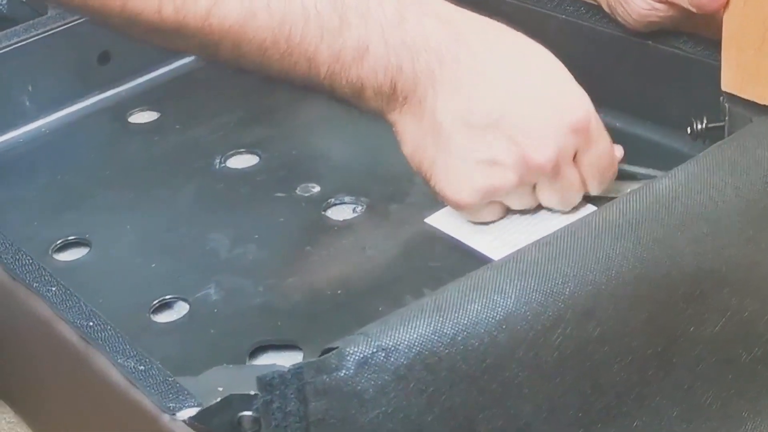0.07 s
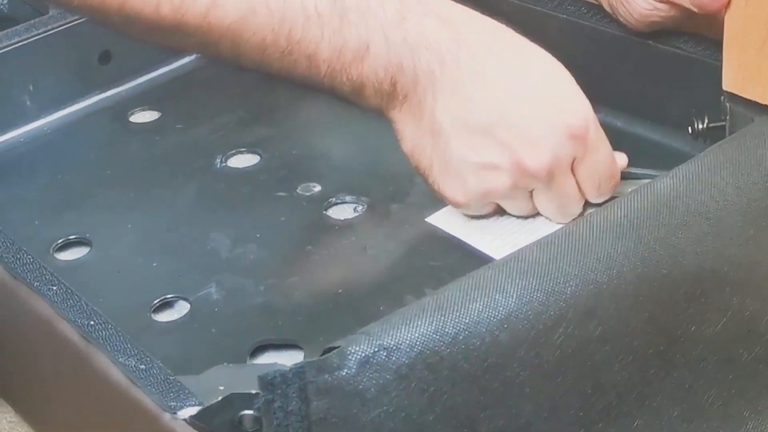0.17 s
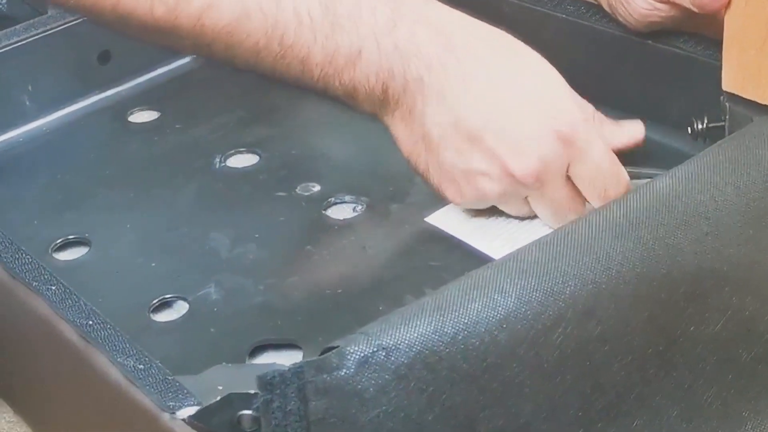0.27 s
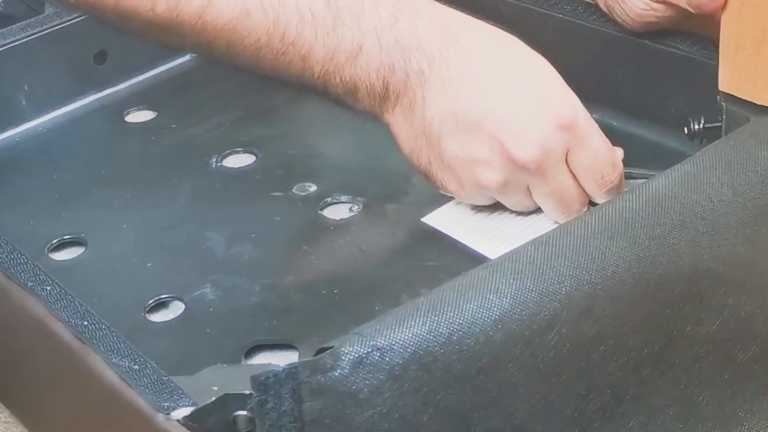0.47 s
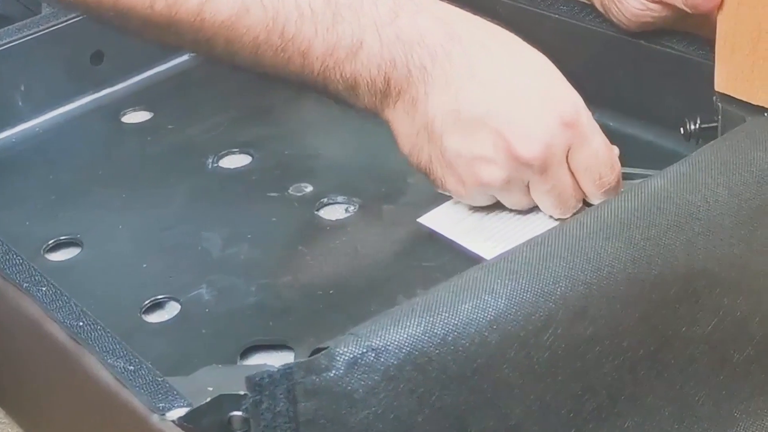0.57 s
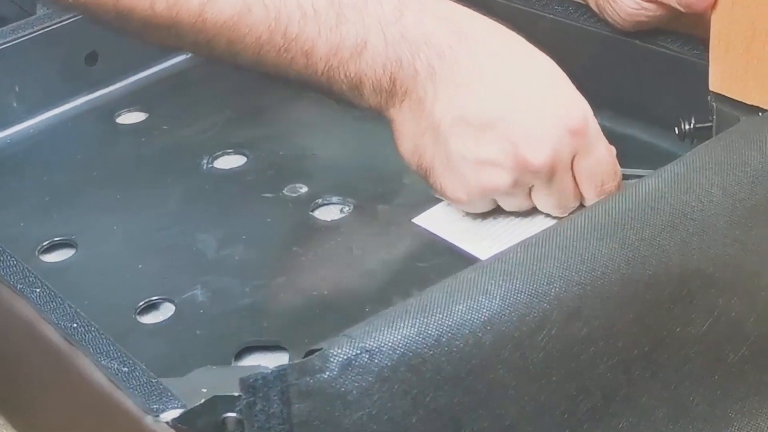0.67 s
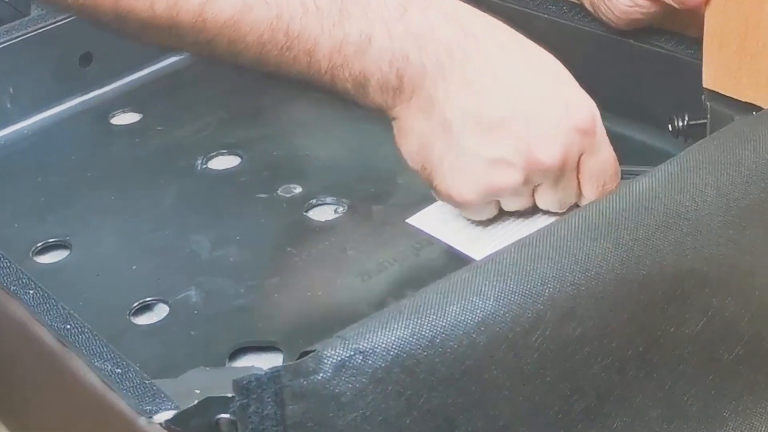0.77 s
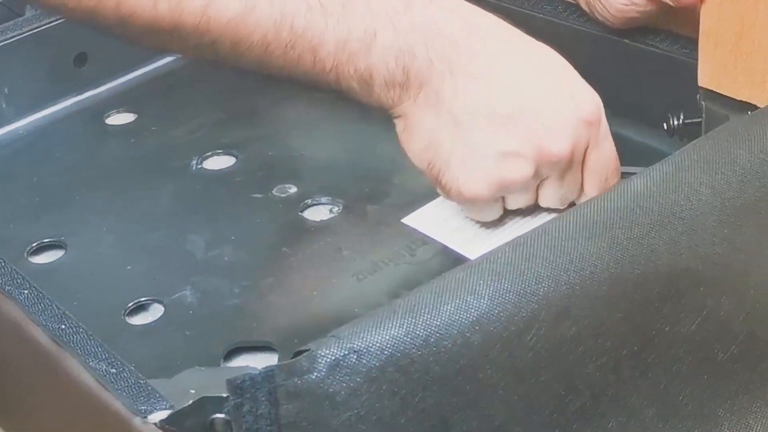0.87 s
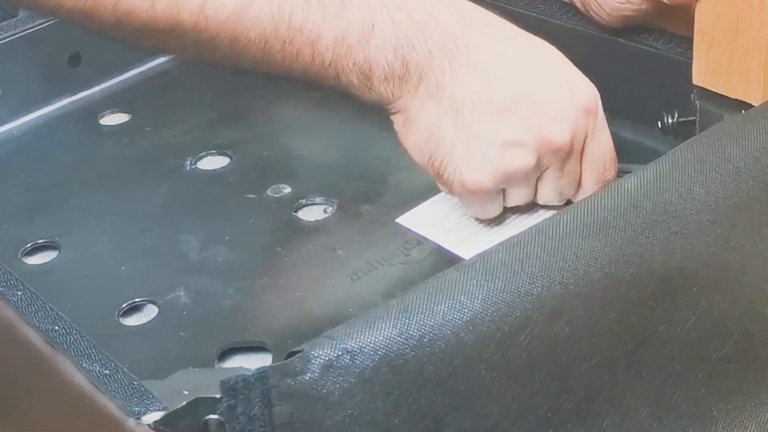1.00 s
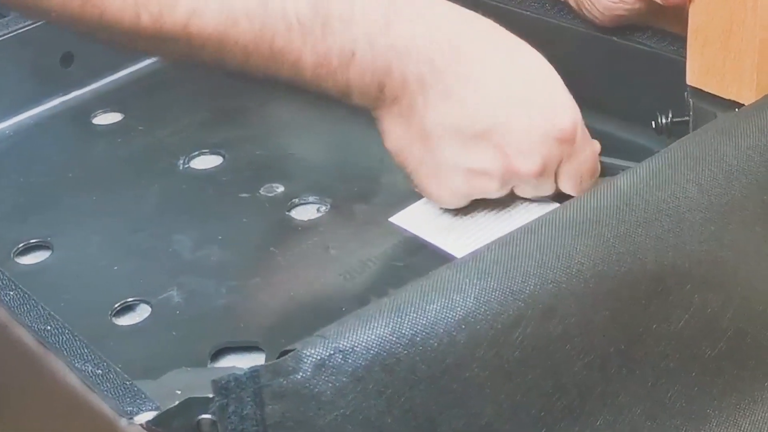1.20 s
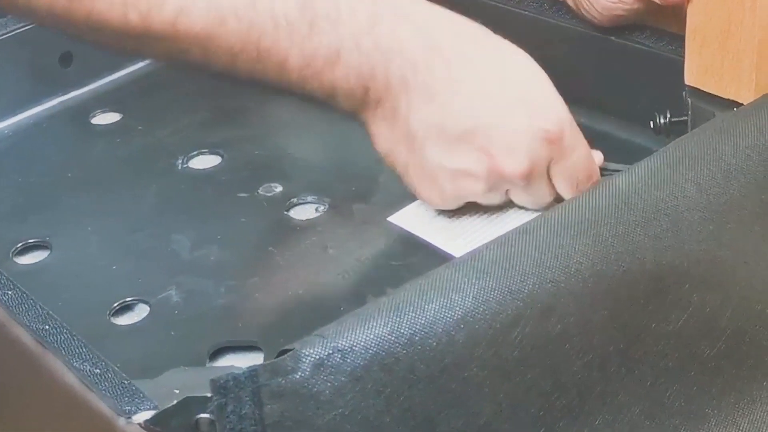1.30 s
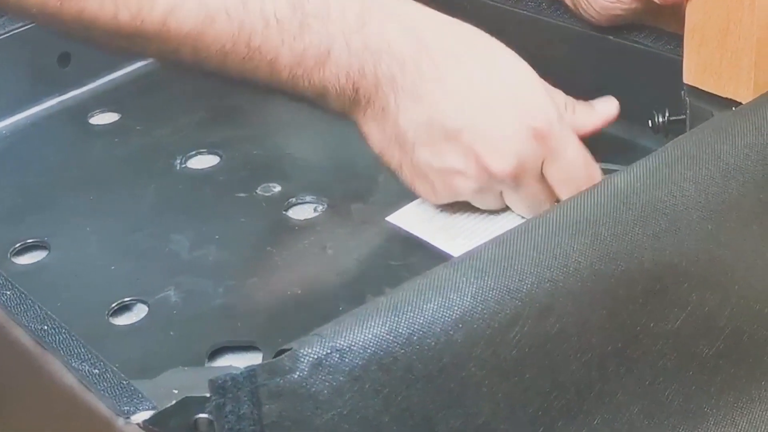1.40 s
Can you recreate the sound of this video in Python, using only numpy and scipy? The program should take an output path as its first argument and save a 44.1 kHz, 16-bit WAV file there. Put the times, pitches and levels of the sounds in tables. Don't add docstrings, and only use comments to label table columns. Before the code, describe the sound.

One sharp knock rings the chair frame, then small steel clicks and faint rubs follow indoors

```python
import sys
import numpy as np
from scipy import signal
from scipy.fft import rfft, irfft, next_fast_len
from scipy.io import wavfile

SR = 44100
rng = np.random.default_rng(int(sys.argv[2]) if len(sys.argv) > 2 else 0)


def gain_from_db(level_db):
    decades = np.asarray(level_db, float) / 20
    return 10 ** decades


def generate_wav(sig):
    pcm = np.round(np.clip(np.atleast_2d(sig).T, -1, 1) * 32767).astype(np.int16)
    wavfile.write(sys.argv[1], SR, pcm)


N = 63945


def unit(x):
    return x / np.sqrt(np.mean(x ** 2) + 1e-20)


def along(points, hz):
    f, value = np.transpose(points)
    return np.interp(np.log(hz + 1), np.log(f + 1), value)


def filtered(x, response):
    size = next_fast_len(x.shape[-1] + 8192)
    spectrum = rfft(x, size) * response(np.fft.rfftfreq(size, 1 / SR))
    return irfft(spectrum, size)[..., :x.shape[-1]]


def add(track, start_s, sound):
    part = track[round(start_s * SR):][:len(sound)]
    part += sound[:len(part)]


def burst(seconds):
    t = np.arange(SR // 4) / SR
    rattle = rng.standard_normal(len(t)) * np.exp(-t / max(seconds, 3e-4))
    z = rfft(rattle, SR // 2)
    power = abs(z) ** 2
    even = irfft(z / np.sqrt(power + 0.02 * np.mean(power)))[:len(t)]
    return unit(even * np.exp(-t / max(4 * seconds, 1e-3)))


def ring(modes, offsets_db, life=1):
    t = np.arange(SR // 4) / SR
    out = np.zeros(len(t))
    for k, (hz, db, t60) in enumerate(modes):
        envelope = gain_from_db(db + offsets_db[k] - 60 * t / max(t60 * life, 1e-3))
        out += (-1) ** k * envelope * np.sin(2 * np.pi * hz * t)
    return out


# centre [f/Hz], half width [Hz]
GAPS = [(10150, 520), (13800, 520)]


def gaps(x):
    return filtered(x, lambda hz: gain_from_db(sum(-41 * np.exp(-((hz - c) / w) ** 4) for c, w in GAPS)))


# [f/Hz], correlation [-1..1]
ALIKE = [(100, .92), (250, .85), (500, .5), (1000, .2), (4000, 0), (8000, -.3), (13000, .5)]


def pair(count):
    def mid_side(hz):
        turn = np.arccos(np.clip(along(ALIKE, hz), -1, 1)) / 2
        return np.array([np.cos(turn), np.sin(turn)])

    mid, side = filtered(rng.standard_normal((2, count)), mid_side)
    return np.array([mid + side, mid - side])


# [f/Hz], [level/dB]
FLOOR = [(15, -38), (25, -13), (109, -8.5), (167, -12.5), (1630, -27), (2300, -20), (2700, -28),
         (8550, -35.5), (15000, -56.5)]


def hiss_floor():
    hiss = unit(filtered(pair(N), lambda hz: gain_from_db(along(FLOOR, hz))))
    return gaps(gain_from_db(-72.5) * hiss)


# [f/Hz], t60 [t/s]
ROOM = [(70, 0.17), (200, 0.48), (400, 0.41), (900, 0.34), (1600, 0.38), (4000, 0.36), (8000, 0.38),
        (13000, .25)]


def room_tail():
    hz, t, z = signal.stft(pair(SR * 2 // 3), SR, nperseg=256)
    decay = gain_from_db(-60 * t / along(ROOM, hz)[:, None])
    tail = signal.istft(z * decay, SR, nperseg=256)[1]
    u = np.arange(tail.shape[1]) / SR
    early_db, early_s, onset_s = 3.5, 0.025, 0.0026
    tail = tail * (1 - np.exp(-u / onset_s)) * gain_from_db(early_db * np.exp(-u / early_s))
    return tail / np.linalg.norm(tail[0])


def heard(near, fed, wet_db):
    left_db, lag_s = 4, 0.00009
    wet = signal.fftconvolve(fed[None], room_tail(), axes=1)[:, :N]
    sides = np.array([[-1], [1]])
    direct = filtered(near, lambda hz: np.exp(-1j * np.pi * hz * lag_s * sides))
    direct = direct * gain_from_db(-sides * left_db / 2)
    return direct + gain_from_db(wet_db) * gain_from_db([[1.4], [-1.4]]) * gaps(wet)


# [f/Hz], width [Hz], [level/dB]
PAN = [(197, 70, -5), (313, 40, 2), (413, 100, -4), (710, 140, -4.5), (1050, 320, -11), (1900, 830, -22.5)]
STROKE_S = [.128, .15, .178, .585, .62, .69, .77, .905, .965, 1.052, 1.125, 1.19, 1.25, 1.348]
# [level/dB], rise [t/s], fall [t/s], brightness [f/Hz]
STROKES = [(-56, 0.0066, 0.011, 500), (-52.5, 0.0057, 0.018, 450), (-57, 0.0093, 0.016, 720),
           (-70.5, 0.023, 0.01, 500), (-56.5, 0.0073, 0.02, 150), (-61, .03, 0.022, 1300),
           (-54.5, 0.0031, 0.0067, 240), (-66.5, 0.0067, 0.015, 1300), (-63.5, 0.016, 0.011, 130),
           (-55, 0.016, 0.017, 1150), (-51, 0.017, 0.043, 250), (-57.5, 0.06, 0.0083, 950),
           (-73, 0.012, .015, 340), (-44.5, 0.0065, 0.034, 490)]


def hand():
    def pan(f):
        return sum((-1) ** k * gain_from_db(db) * 1j * f * w / (c * c - f * f + 1j * f * w)
                   for k, (c, w, db) in enumerate(PAN))

    t, out = np.arange(N) / SR, np.zeros(N)
    for s, (db, rise, fall, bright_hz) in zip(STROKE_S, STROKES):
        swell = np.exp(-0.5 * ((t - s) / rise) ** 2)
        pressure = np.where(t < s, swell, np.exp(-abs(t - s) / fall))
        noise = rng.standard_normal(N)
        grit = unit(filtered(noise, lambda f: pan(f) / (1 + 1j * f / bright_hz) ** 2 * 1j * f))
        out += gain_from_db(db) * pressure * grit
    bump = ring([(108, -36.5, 0.073)], [0])
    add(out, 1.098, bump * (1 - np.exp(-t[:SR // 4] / 0.004)))
    return out


# [f/Hz], [level/dB], t60 [t/s]
KEY = [(863.2, 1.5, 0.018), (1158.5, 3, 0.077), (1920, -26, .02), (2330, -18.5, .04), (2446, -4.5, 0.039),
       (3514, -7.5, 0.0098), (3814, 3.5, 0.011), (4730, -10, 0.06), (6150, -8.5, .012), (11200, -2, 0.012)]
TICK_S = [.0135, .6435, .657, .684, .727, .757, .884, .9, 1.015, 1.1205, 1.3235, 1.3285, 1.339]
# [level/dB], colour centre [f/Hz], colour sharpness [ratio], ring over grit [dB],
# chatter length [t/s]
TICKS = [(-53, 2920, 1.4, 0.5, 0.0056), (-47, 2780, 0.63, 3, 0.0095), (-54, 730, 0.5, 19, 0.0072),
         (-58, 2300, 0.84, 3, 0.0076), (-53, 5000, 0.16, 5.5, 0.0021), (-53.5, 2500, 1.2, -17, 0.003),
         (-63.5, 1370, 0.45, -41, 0.021), (-60.5, 1000, 0.39, 21, 0.0043), (-67, 8400, 0.36, -4, .03),
         (-38.5, 4100, 0.71, -2, 0.0018), (-40, 2500, .6, -13.5, 0.0016), (-24.5, 3760, 0.57, -3.5, 0.0058),
         (-32, 675, 0.36, 4, 0.0032)]


def key():
    fed_life = 0.46
    scatter_db, skirt_db, top_hz = 2, -24, 12900
    ticks = []
    for s, (db, centre_hz, sharp, ring_db, length) in zip(TICK_S, TICKS):
        def colour(hz):
            x = 1j * hz / centre_hz / sharp
            peak = (x / (1 - (hz / centre_hz) ** 2 + x)) ** 2
            return (peak + gain_from_db(skirt_db)) / (1 + (hz / top_hz) ** 20)

        chatter, out = burst(length), np.zeros((2, N))
        offsets_db = scatter_db * rng.standard_normal(len(KEY))
        for track, life in zip(out, (1, fed_life)):
            steel = ring(KEY, offsets_db, life)
            rung = unit(signal.fftconvolve(chatter, steel)[:len(chatter)])
            add(track, s, filtered(gain_from_db(ring_db) * rung + chatter, colour))
        ticks.append(gain_from_db(db) * out / abs(out[0]).max())
    return ticks


# [f/Hz], [level/dB], t60 [t/s]
WOOD = [(156.3, -4, .09), (204, -0.5, 0.07), (315.5, 5, 0.028), (497, 2, 0.046), (729, 8.5, 0.02),
        (1045.4, 1.5, 0.048), (1156.4, 1, 0.11), (1249, 3, 0.026), (1380, -10.5, 0.036),
        (1609, -1.5, 0.045), (1980, -2.5, 0.035), (2410, -18.5, .03), (2787, -11.5, 0.06), (3150, -7, .02)]
# [f/Hz], [level/dB]
CRACK = [(100, -45.5), (600, -31), (1300, 4.5), (3000, -4), (5500, -10), (9000, -14.5), (12500, -18),
         (15500, -31.5)]


def knock():
    knock_s, knock_db, fed_life = 0.2143, -17, 0.37
    crack_db, crack_t60_s, onset_s = 11.5, 0.025, 0.00031
    out, t = np.zeros((2, N)), np.arange(SR // 4) / SR
    crack = filtered(burst(crack_t60_s / np.log(1000)), lambda hz: gain_from_db(along(CRACK, hz)))
    crack = gain_from_db(crack_db) * crack / abs(crack).max()
    for track, life in zip(out, (1, fed_life)):
        wood = ring(WOOD, np.zeros(len(WOOD)), life) / np.sqrt(life)
        add(track, knock_s, gain_from_db(knock_db) * (wood + crack) * (1 - np.exp(-t / onset_s)))
    return out


def scene():
    rubbing = hand()
    sources = heard(rubbing, rubbing, wet_db=-0.5)
    for near, fed in key():
        sources = sources + heard(near, fed, wet_db=6.5)
    sources = sources + heard(*knock(), wet_db=4.5)
    low_cut_hz = 85
    return filtered(sources, lambda hz: (1j * hz / (low_cut_hz + 1j * hz)) ** 3) + hiss_floor()


def band_limit(x):
    return signal.sosfilt(signal.butter(12, 16460, fs=SR, output="sos"), x)


def record(dry):
    ceiling = 2
    return band_limit(ceiling * np.tanh(dry / ceiling))


dry = scene()
out = record(dry)
generate_wav(out)
```